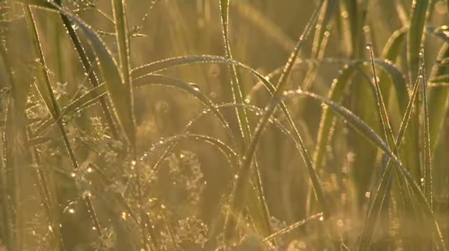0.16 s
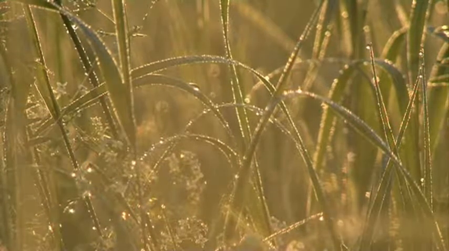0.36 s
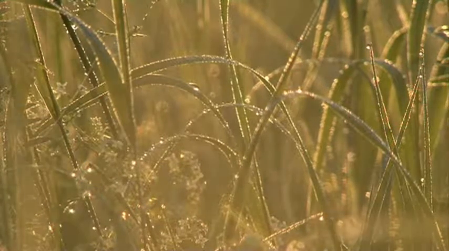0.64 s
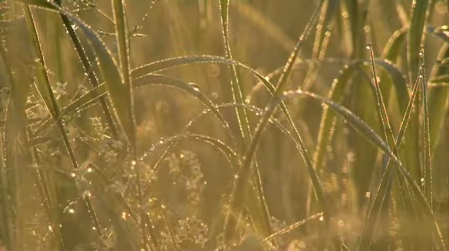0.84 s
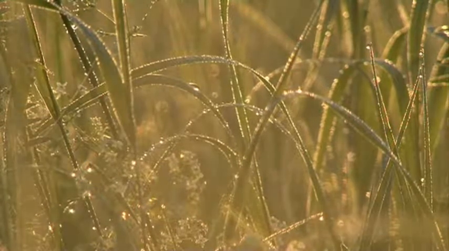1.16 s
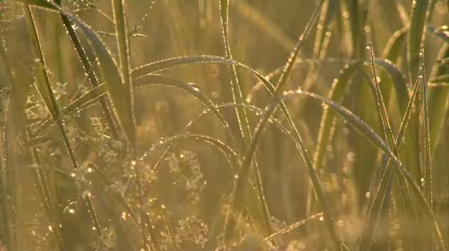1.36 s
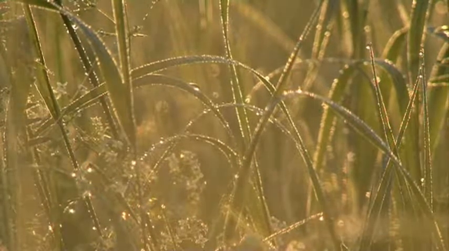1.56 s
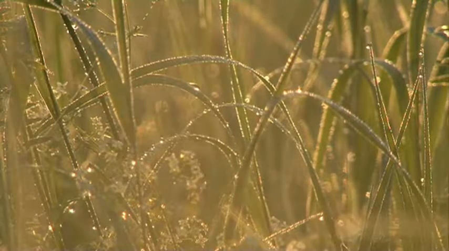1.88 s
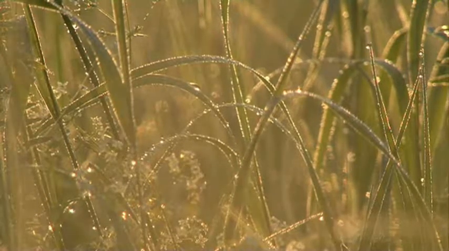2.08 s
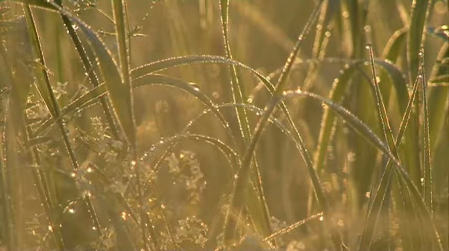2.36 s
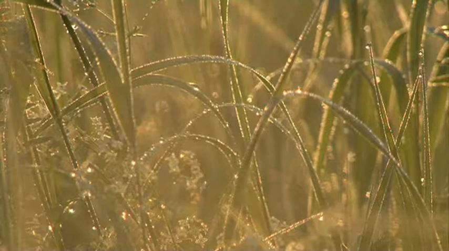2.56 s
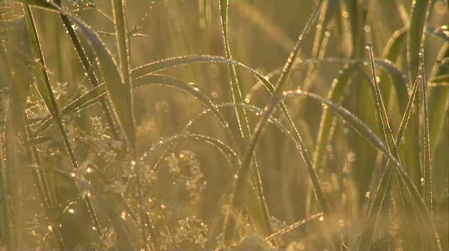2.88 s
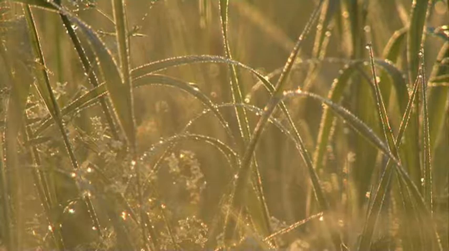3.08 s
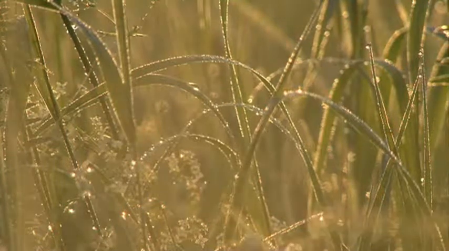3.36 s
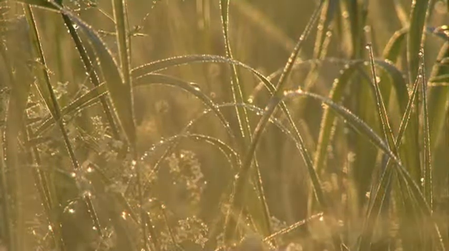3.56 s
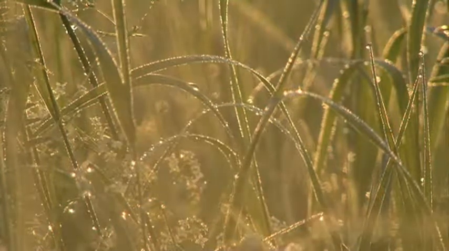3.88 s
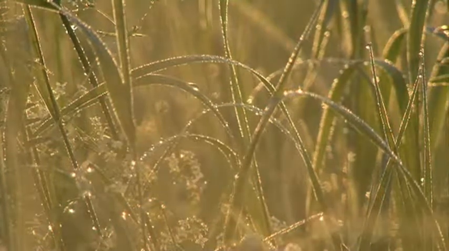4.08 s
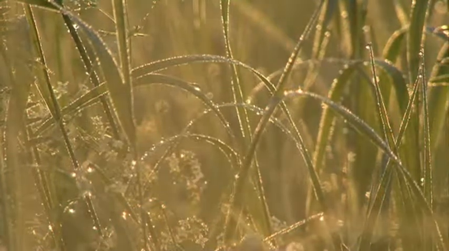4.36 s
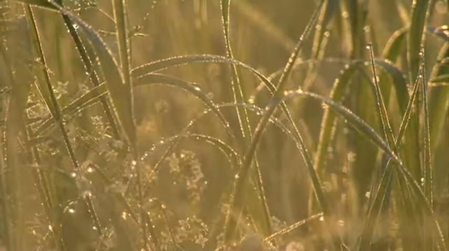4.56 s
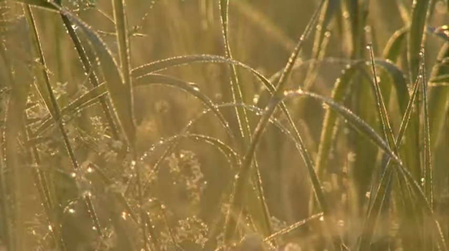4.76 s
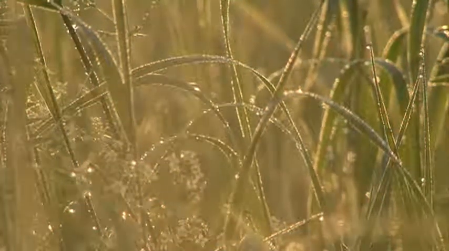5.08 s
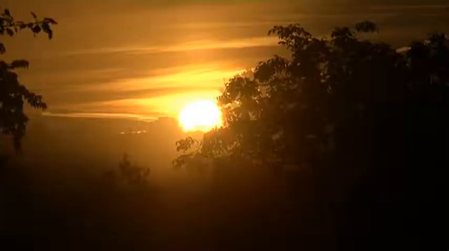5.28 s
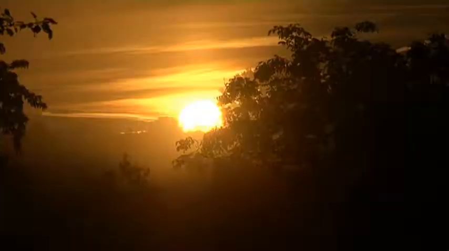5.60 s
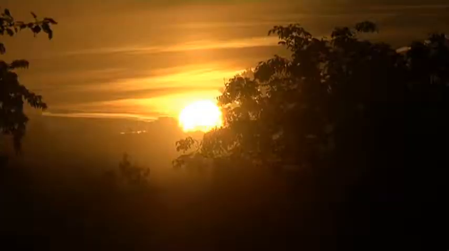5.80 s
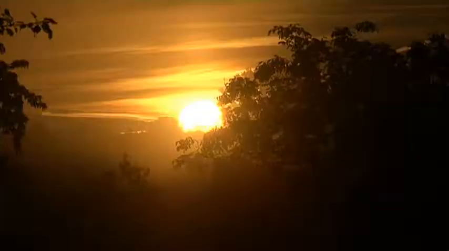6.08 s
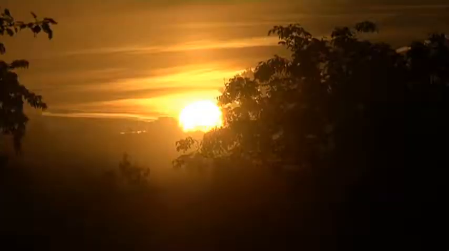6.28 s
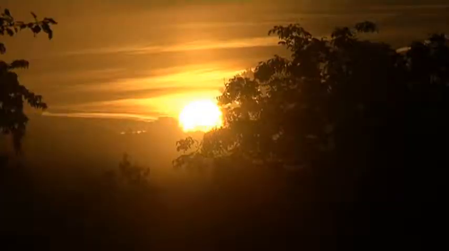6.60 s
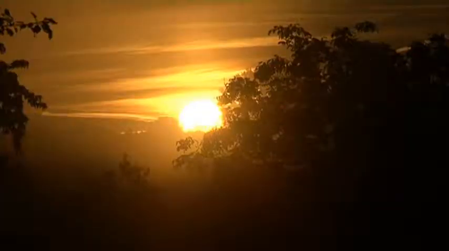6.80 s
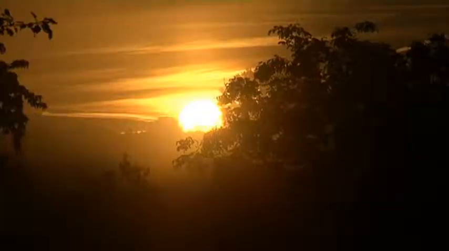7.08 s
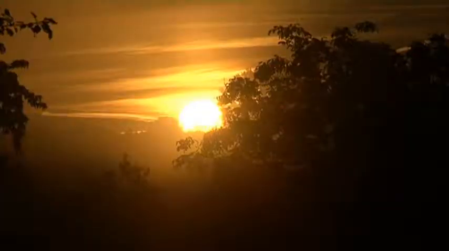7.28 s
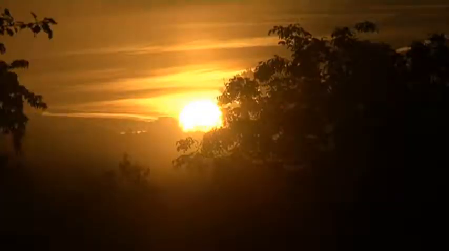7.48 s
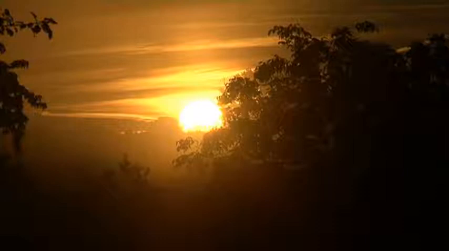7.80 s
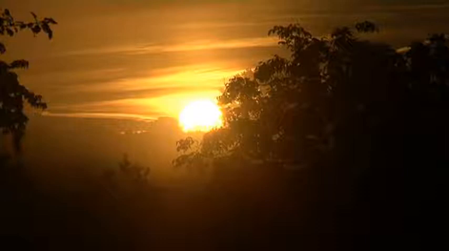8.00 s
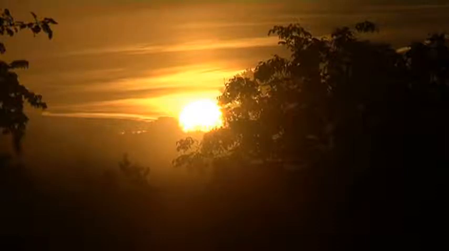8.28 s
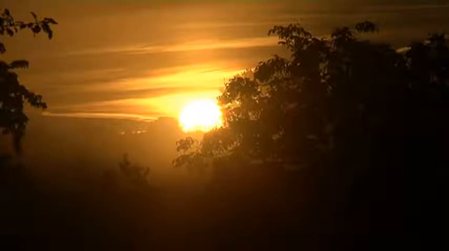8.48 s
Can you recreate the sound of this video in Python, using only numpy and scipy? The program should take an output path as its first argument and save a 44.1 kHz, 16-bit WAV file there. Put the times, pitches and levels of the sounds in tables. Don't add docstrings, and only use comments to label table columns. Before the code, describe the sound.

Quiet meadow dawn: a bird's harsh far chatter, then a close rapid rattle with clear falling whistles, later thin peeps, over distant road rumble and hum.

```python
import sys
import numpy as np
from scipy import signal
from scipy.fft import rfft, irfft, next_fast_len
from scipy.io import wavfile

SR = 44100
rng = np.random.default_rng(int(sys.argv[2]) if len(sys.argv) > 2 else 0)


def boost_factor(decibels):
    exponent = np.asarray(decibels, float) / 20
    return 10 ** exponent


def waveform_to_disk(signal):
    frames = np.transpose(np.atleast_2d(signal))
    scaled = np.clip(frames, -1, 1) * 32767
    samples = np.round(scaled).astype(np.int16)
    wavfile.write(sys.argv[1], SR, samples)


N = 381465

# (share of length [0-1], share of glide [0-1], level [dB])
PLAIN_SHAPE = [(0, 0, -1.5), (.5, .6, 1.5), (1, 1, -3)]


def at_hz(points, hz):
    points_hz, points_db = np.transpose(points)
    return np.interp(np.log(hz + 1e-9), np.log(points_hz), points_db)


def coloured(x, spectrum):
    size = next_fast_len(N)
    bins_hz = np.arange(size // 2 + 1) * SR / size
    out = irfft(rfft(x, size) * boost_factor(at_hz(spectrum, bins_hz)), size)[:N]
    return out / np.std(out)


def in_time(rows):
    s, *columns = np.transpose(rows)
    return [np.interp(np.arange(N) / SR, s, column) for column in columns]


def drift(rate_hz, size):
    r = np.exp(-2 * np.pi * rate_hz / SR)
    slow = signal.lfilter([1], [1, -2 * r, r * r], rng.standard_normal(size + SR))[SR:]
    return slow / np.std(slow)


def add(out, start_s, x):
    i = round(start_s * SR)
    out[i:i + len(x)] += x[:N - i]


def series(rows, rising, hoarse):
    steps = zip(rows, np.linspace(*rising, len(rows)), np.linspace(*hoarse, len(rows)))
    return [(s, s + length, hz, rise, rough, db) for (s, length, hz, db), rise, rough in steps]


def chatter(notes, throat, start_share, end_share, windpipe_db, grain_hz):
    out, wobble = np.zeros(N), drift(150, N)
    orders = np.arange(4, 44)[:, None] / 2
    smooth = signal.butter(2, grain_hz, fs=SR, output="sos")
    for start, end, top_hz, rising, hoarse, db in notes:
        i, u = round(start * SR), np.linspace(0, 1, round((end - start) * SR))
        arch_at = [0, .5 * rising, rising, .82, 1]
        arch = np.interp(u, arch_at, [start_share, .52 + .5 * start_share, .98, 1.01, end_share])
        pulse_hz = top_hz * arch * (1 + .01 * hoarse * wobble[i:i + len(u)])
        windpipe = boost_factor(windpipe_db) * np.exp(-((orders * pulse_hz - 5450) / 500) ** 2)
        weights = boost_factor(at_hz(throat, orders * top_hz)) + windpipe
        shake = signal.sosfilt(smooth, rng.standard_normal((len(orders), 4000)))[:, -len(u):]
        shake_share = np.clip(.7 * hoarse * (orders * top_hz / 4300) ** 1.5 + .3 * (1 - arch), 0, 1)
        steady = np.sqrt(1 - shake_share) * (orders % 1 == 0)
        strength = steady + .9 * np.sqrt(shake_share) * shake / np.std(shake)
        phase = orders * 2 * np.pi * np.cumsum(pulse_hz) / SR + orders ** 2
        note = (weights * strength * np.cos(phase)).sum(axis=0)
        swell = np.interp(u, [0, .2, .55, .8, .92, 1], [0, .55, 1, 1, .4, 0])
        add(out, start, boost_factor(db) * swell * note / np.std(note))
    return out


def near_chatter():
    # (start [s], length [s], top pulse rate [Hz], level [dB])
    short_notes = [(3.057, 0.036, 726, -50.5), (3.097, 0.038, 763, -49.5), (3.146, 0.034, 737, -49),
                   (3.193, .033, 760, -47), (3.241, .033, 737, -48.5), (3.29, 0.031, 713, -47.5),
                   (3.34, .034, 716, -49), (3.39, 0.036, 718, -49.5), (3.445, 0.04, 800, -47.5),
                   (3.503, .034, 795, -46.5), (3.56, .045, 770, -47.5), (3.63, 0.043, 792, -46),
                   (3.7, .05, 808, -45.5), (3.793, 0.062, 688, -46.5)]
    # (frequency [Hz], level [dB])
    throat = [(1500, -28), (2150, -12), (2600, -21), (3100, -21), (3550, -6), (3950, 0), (4450, -1),
              (4950, -10), (5600, -12), (6600, -15), (7500, -23), (9500, -31)]
    return chatter(series(short_notes, (.48, .72), (.55, .38)), throat, .78, .8, windpipe_db=-14, grain_hz=200)


def long_notes():
    # (start [s], length [s], top pulse rate [Hz], level [dB])
    notes = [
        (3.903, .07, 495, -46.5),
        (4.015, .068, 517, -46),
        (4.138, .073, 672, -45),
    ]
    # (frequency [Hz], level [dB])
    wide_throat = [(1500, -30), (2000, -13), (2600, -7), (3050, -23), (3500, -20), (4050, 0), (4650, 0),
                   (5250, -1), (5900, -10), (6800, -11), (8000, -19), (11000, -29)]
    return chatter(series(notes, (.72, .36), (.16, .12)), wide_throat, .78, .82, windpipe_db=-12, grain_hz=100)


def far_chatter():
    # (start [s], length [s], top pulse rate [Hz], level [dB])
    far_notes = [(.25, 0.039, 703, -58), (.32, 0.041, 695, -59), (.388, .04, 700, -59),
                 (.455, 0.048, 720, -60), (.54, .04, 683, -57.5), (.615, .037, 695, -59),
                 (.684, 0.051, 680, -59), (.772, .056, 697, -58.5)]
    # (frequency [Hz], level [dB])
    far_throat = [(2000, -30), (2750, -18), (3250, -4), (3750, -5), (4300, 0), (4750, -3), (5300, -11),
                  (7000, -20)]
    return chatter(series(far_notes, (.5, .8), (.7, .8)), far_throat, .84, .97, windpipe_db=-24, grain_hz=150)


def sung(rows, shape):
    u, glide, shape_db = np.transpose(shape)
    return [np.transpose([s + length * np.sort(u), hz + (end_hz - hz) * glide, db + shape_db])
            for s, length, hz, end_hz, db in rows]


def whistles(notes, wobble, wobble_hz, flutter_db):
    out, shake, flutter = np.zeros(N), drift(wobble_hz, N), boost_factor(flutter_db * drift(48, N))
    for s, hz, db in map(np.transpose, notes):
        t = np.arange(s[0], s[-1], 1 / SR)
        i = round(s[0] * SR)
        ends = np.clip(np.minimum(t - s[0], s[-1] - t) / .003, 0, 1)
        pitch_hz = np.interp(t, s, hz) * (1 + wobble * shake[i:i + len(t)])
        phase = 2 * np.pi * np.cumsum(pitch_hz) / SR
        add(out, s[0], np.sqrt(2) * boost_factor(np.interp(t, s, db)) * ends * np.sin(phase))
    return out * flutter


def clear_whistles():
    # (start [s], length [s], start pitch [Hz], end pitch [Hz], level [dB])
    long_fall = [(3.01, .027, 7800, 7650, -63), (3.037, 0.027, 7660, 7060, -52),
                 (3.062, 0.053, 7150, 6770, -54), (3.122, 0.035, 6760, 6700, -57),
                 (3.17, 0.074, 6670, 6420, -51), (3.244, 0.059, 6400, 6230, -53.5)]
    plaints = [
        (3.425, 0.1, 5030, 4540, -45),
        (3.697, .064, 5090, 4800, -45.5),
        (3.762, 0.045, 4720, 4680, -57),
    ]
    plaint_ends = [
        (3.533, .013, 3300, 3200, -50.5),
        (3.552, 0.026, 2750, 2300, -64),
        (3.803, 0.041, 3350, 2480, -64),
    ]
    peeps = [
        (6.701, .071, 3670, 4280, -52.5),
        (6.929, .072, 3950, 4276, -49),
        (7.533, 0.081, 3850, 4225, -64),
        (7.79, 0.08, 3793, 4250, -67.5),
    ]
    # (share of length [0-1], share of glide [0-1], level [dB])
    fall_shape = [(0, 0, -11), (.3, 0.32, -3), (.75, .8, -1.5), (1, 0.94, -5)]
    plaint_shape = [(0, 0.024, -8), (.1, 0.24, -6), (.28, .55, 1), (.65, .6, -2.5), (1, 0.89, -13)]
    peep_shape = [(0, 0, -10), (.17, 0.83, -2.5), (.8, 1, -0.5), (1, 1, -6)]
    clear = sung(long_fall, fall_shape) + sung(plaint_ends, PLAIN_SHAPE) + sung(peeps, peep_shape)
    out = whistles(clear, .0048, wobble_hz=100, flutter_db=1.5)
    return out + whistles(sung(plaints, plaint_shape), .009, wobble_hz=200, flutter_db=2.0)


def high_drops():
    # (start [s], length [s], start pitch [Hz], end pitch [Hz], level [dB])
    drops = [
        (6.77, 0.094, 7690, 6830, -51.5),
        (6.935, 0.1, 7530, 6380, -52),
        (7.098, .078, 6840, 5400, -53.5),
    ]
    # (share of length [0-1], share of glide [0-1], level [dB])
    drop_shape = [(0, .12, -9), (.1, 0.011, -8), (.4, .08, -3.5), (.74, .36, 0), (.9, 0.6, -6), (1, 1, -8)]
    return whistles(sung(drops, drop_shape), .006, wobble_hz=120, flutter_db=2.5)


def burry_whistles():
    # (start [s], length [s], start pitch [Hz], end pitch [Hz], level [dB])
    burrs = [(.258, 0.038, 4260, 4300, -57.5), (.32, .038, 4320, 4240, -66), (.385, .043, 4300, 4160, -69),
             (.618, 0.029, 4220, 4400, -58), (.705, .05, 7170, 7240, -72), (.54, .025, 7450, 7500, -78),
             (2.635, .075, 8350, 8200, -75), (2.675, .095, 7100, 6800, -74), (5.18, .04, 7450, 7300, -74),
             (8.343, 0.05, 7750, 8500, -69.5)]
    run_ups = [
        (6.675, 0.031, 3000, 3040, -64),
        (6.674, .03, 4600, 6500, -63),
        (6.4, .014, 3400, 3800, -69),
        (6.905, .02, 5200, 5660, -62),
    ]
    out = whistles(sung(burrs, PLAIN_SHAPE), .012, wobble_hz=200, flutter_db=3.0)
    return out + whistles(sung(run_ups, PLAIN_SHAPE), .05, wobble_hz=300, flutter_db=3.0)


def trees(x, t60_s, scatter_db, echo_s, echo_db):
    t = np.arange(SR // 2) / SR
    tail = rng.standard_normal(len(t)) * boost_factor(-60 * t / t60_s) * np.clip(t / .012, 0, 1)
    tail *= boost_factor(scatter_db) / np.sqrt(np.sum(tail ** 2))
    tail[round(echo_s * SR)] += boost_factor(echo_db)
    return x + signal.fftconvolve(x, tail)[:N]


def bursts(events, length_s, spread, db, order):
    out, u = np.zeros(N), np.linspace(0, 1, round(length_s * SR))
    swell = np.sin(np.pi * u ** .75) ** 2
    for (s, peak_db, hz), noise in zip(events, rng.standard_normal((len(events), 2000))):
        band = signal.butter(order, [hz / spread, hz * spread], "band", fs=SR, output="sos")
        puff = signal.sosfilt(band, noise)[-len(u):]
        add(out, s, boost_factor(peak_db + db) * puff / np.std(puff) * swell)
    return out


def fowl():
    # (time [s], peak level [dB], pitch [Hz])
    clucks = [(2.185, -65, 1850), (2.394, -66, 1900), (2.596, -60, 1990), (4.34, -70, 1900),
              (4.521, -63, 2050), (4.75, -60, 1950), (4.923, -61.5, 1990), (6.778, -63, 1950),
              (6.946, -62.5, 2000), (7.186, -64, 2060), (7.37, -67, 2200), (7.428, -65.5, 1850),
              (7.612, -63, 1950)]
    return bursts(clucks, .027, 1.21, db=2.5, order=2)


def dew():
    # (time [s], peak level [dB], pitch [Hz])
    ticks = [(1.248, -61, 3420), (1.3089, -63, 3040), (1.6646, -63, 3200), (1.7494, -67, 3520),
             (2.0308, -69, 2790), (2.1036, -61, 2750), (2.155, -65, 3040), (2.3092, -65, 2570),
             (2.5197, -62, 2700), (2.8055, -64, 3210), (4.408, -62, 2990), (4.6793, -64, 3210),
             (4.7447, -58, 2620), (5.088, -63, 3000), (5.248, -64, 3230), (5.7383, -62, 3027),
             (5.932, -63, 2680), (6.088, -64, 2933), (6.1913, -65, 3234), (6.4547, -64, 4400),
             (7.9141, -65, 2486), (8.2776, -65, 3950), (8.3414, -63, 4160)]
    return bursts(ticks, .0088, 1.22, db=1.5, order=1)


def engine():
    # (time [s], firing rate [Hz], effort [dB], load: order 1 over order 2 [dB])
    pull = [(3.2, 43, -54, -10), (4.0, 43, -48, -14), (4.7, 46.1, -50, -14), (5.2, 48.13, -55, -5),
            (5.7, 51.7, -53, 0.5), (6.3, 51.2, -50.5, -1.5), (6.8, 53.64, -46.5, -17),
            (7.15, 55.86, -48.5, 2.5), (7.5, 57.96, -52, -14), (8.0, 60.53, -51, -5.5),
            (8.45, 62, -53, 4.5), (8.65, 64.5, -58, 1)]
    hz, db, load_db = in_time(pull)
    phase = 2 * np.pi * np.cumsum(hz * (1 + .00982 * drift(1.87, N))) / SR
    fade = np.clip(np.arange(N) / SR - pull[0][0], 0, 1)
    half_order_db = db - 10.5 + 5.8 * drift(1.5, N)
    levels_db = db + load_db, db, half_order_db
    return fade * sum(boost_factor(level) * np.sin(k * phase) for k, level in zip((1, 2, 1.5), levels_db))


def drone(hz, width_hz):
    # (time [s], level [dB])
    loudness = [(0.0, -42), (0.36, -58.5), (2.17, -59), (2.38, -51.5), (4.38, -59.5), (4.91, -51),
                (8.36, -68), (8.65, -49)]
    r, x = np.exp(-np.pi * width_hz / SR), rng.standard_normal(N)
    for _ in range(2):
        x = signal.lfilter([1 - r], [1, -2 * r * np.cos(2 * np.pi * hz / SR), r * r], x)
    return boost_factor(in_time(loudness)[0] - 5.0) * x / np.std(x)


def road():
    # (frequency [Hz], density [dB per Hz])
    rumble_spectrum = [(13, -67), (22, -49), (32, -19), (51, -7.5), (70, 0.5), (119, -0.5), (160, -3.5),
                       (188, -7), (210, -8.5), (371, -22), (420, -21), (550, -40), (920, -120)]
    roar_spectrum = [(180, -27), (300, -10), (372, -7), (481, -0.5), (830, -0.5), (988, -0.5), (1240, -3),
                     (1450, -7), (2120, -14), (3500, -19.5), (4550, -22.5), (7700, -120)]
    t = np.arange(N) / SR
    rumble_db = -50.5 + .13 * t + .5 * drift(1.0, N)
    roar_db = -57 - .1563 * t + .5 * drift(9.4, N)
    rumble = boost_factor(rumble_db) * coloured(rng.standard_normal(N), rumble_spectrum)
    return rumble + boost_factor(roar_db) * coloured(rng.standard_normal(N), roar_spectrum)


def scene():
    birds = trees(near_chatter() + long_notes(), .42, -7, echo_s=.044, echo_db=-28)
    birds += trees(far_chatter() + burry_whistles(), .2, -6, echo_s=.057, echo_db=-23)
    birds += trees(high_drops(), .4, -5, echo_s=.075, echo_db=-22)
    birds += trees(clear_whistles(), .4, -16, echo_s=.08, echo_db=-27)
    return (birds + fowl() + dew() + engine() + drone(156.0, width_hz=7.4) + road())[None]


def roll_off(x):
    return signal.sosfilt(signal.butter(12, 15450, fs=SR, output="sos"), x)


def record(dry):
    # (frequency [Hz], density [dB])
    hiss_spectrum = [(1290, -11), (2200, -12.5), (5180, -2), (5530, -3.5), (12400, -5), (14800, -3.5),
                     (15400, -4)]
    hiss_db, clock_hz = -66, 3903
    x = dry[0] + boost_factor(hiss_db) * coloured(rng.standard_normal(N), hiss_spectrum)
    turn = 2 * np.pi * clock_hz * np.arange(N) / SR
    late_s = 6.2e-6 * np.sin(turn) + 2.9e-6 * np.sin(2 * turn)
    size = next_fast_len(N)
    bins_hz = np.arange(size // 2 + 1) * SR / size
    slope = irfft(rfft(x, size) * 2j * np.pi * bins_hz, size)[:N]
    return roll_off((x + late_s * slope)[None])


dry = scene()
out = record(dry)
waveform_to_disk(out)
```